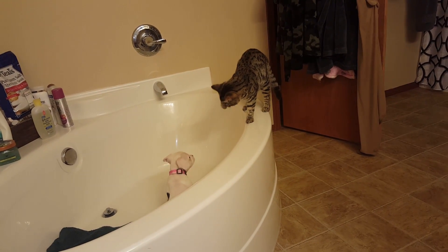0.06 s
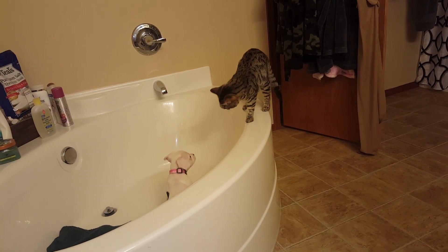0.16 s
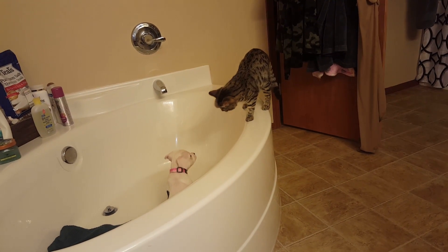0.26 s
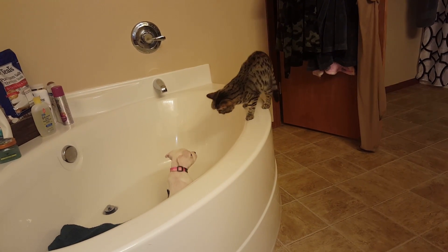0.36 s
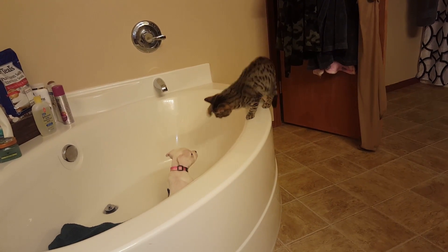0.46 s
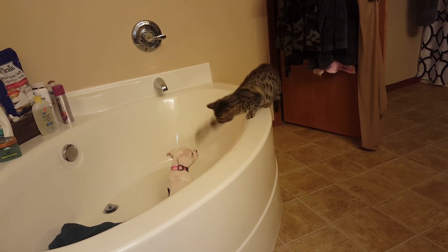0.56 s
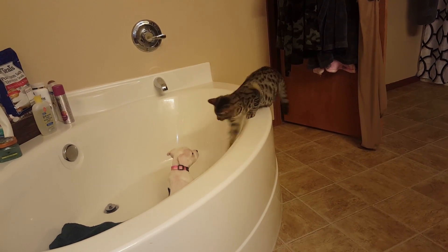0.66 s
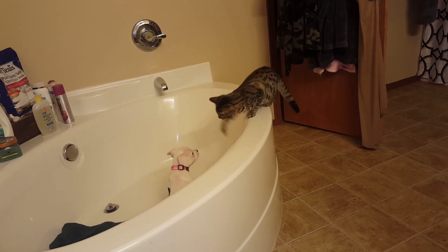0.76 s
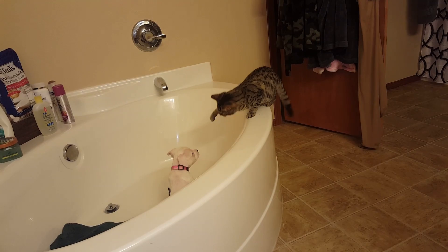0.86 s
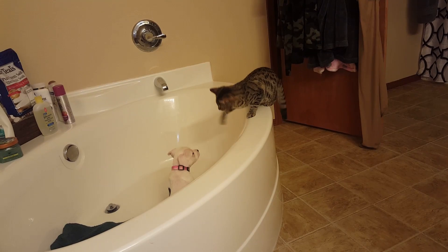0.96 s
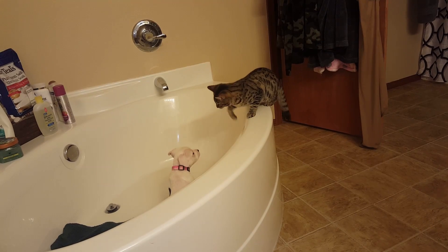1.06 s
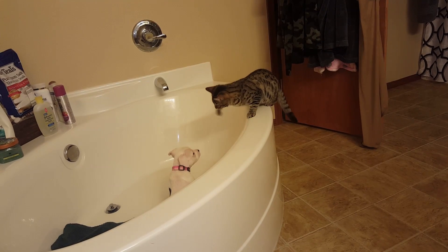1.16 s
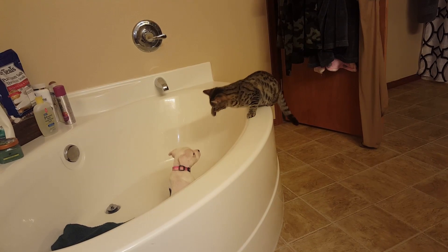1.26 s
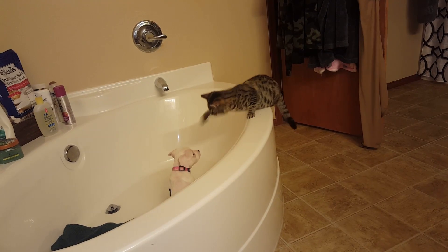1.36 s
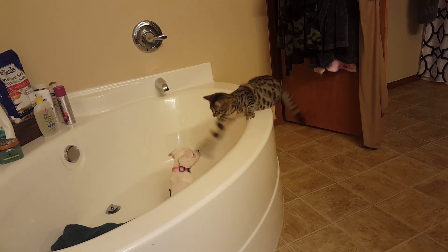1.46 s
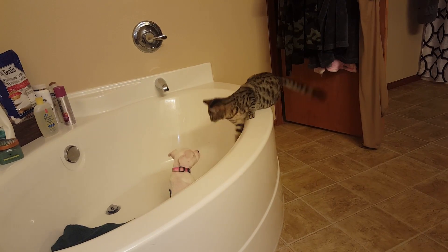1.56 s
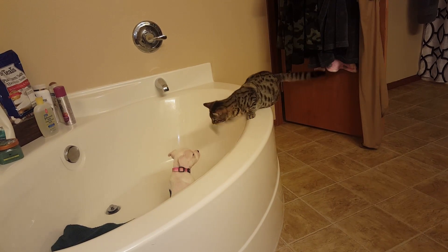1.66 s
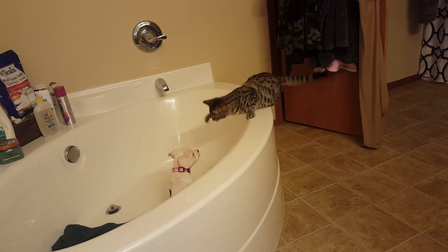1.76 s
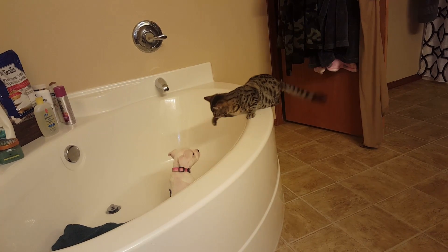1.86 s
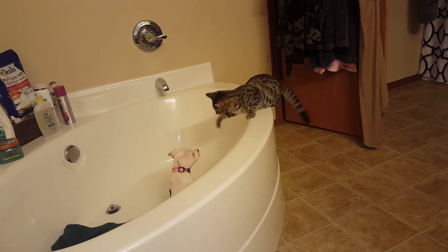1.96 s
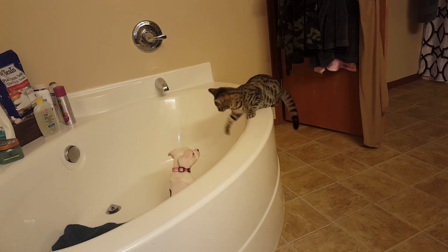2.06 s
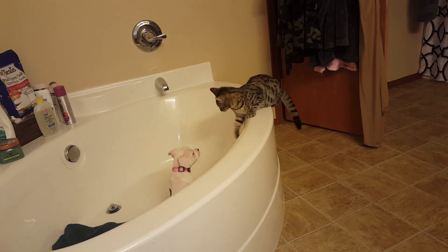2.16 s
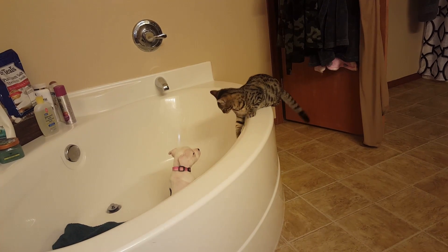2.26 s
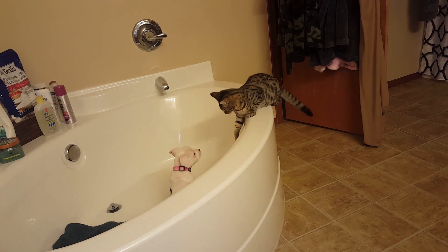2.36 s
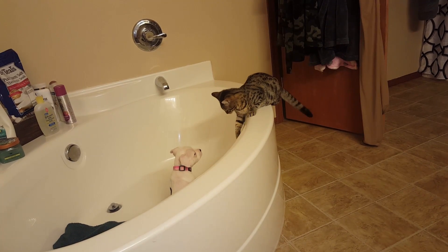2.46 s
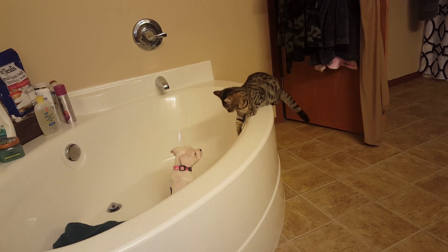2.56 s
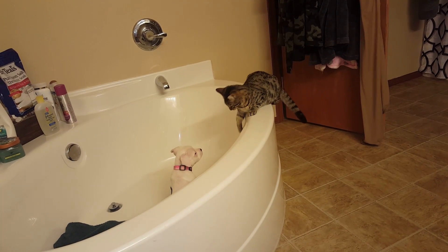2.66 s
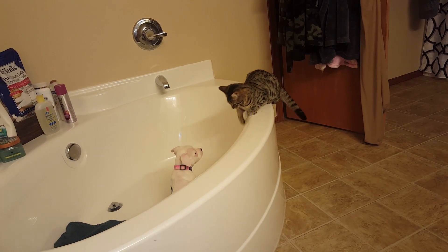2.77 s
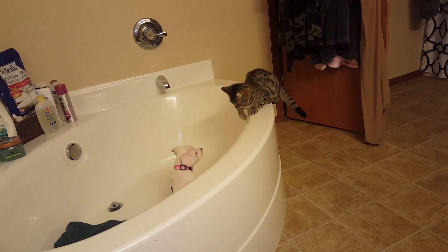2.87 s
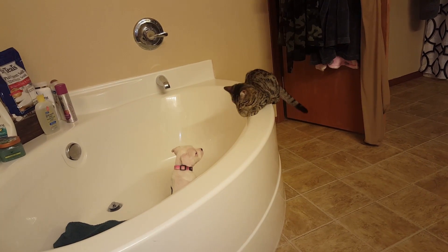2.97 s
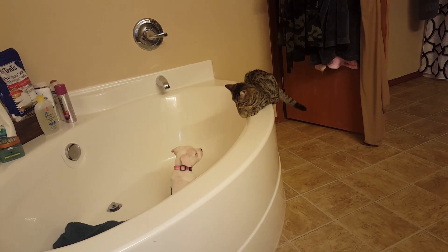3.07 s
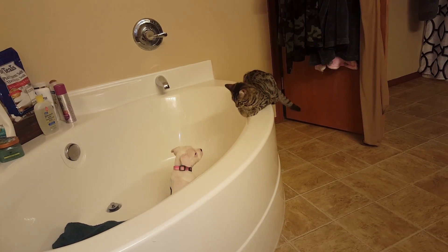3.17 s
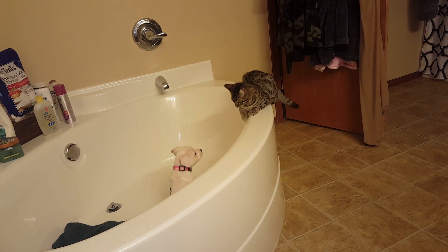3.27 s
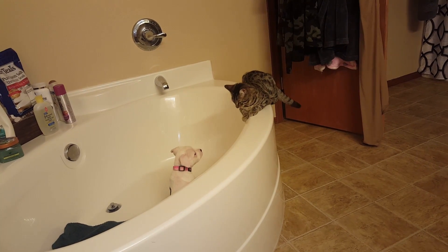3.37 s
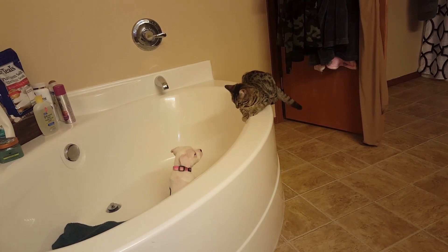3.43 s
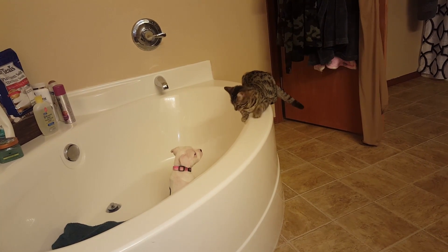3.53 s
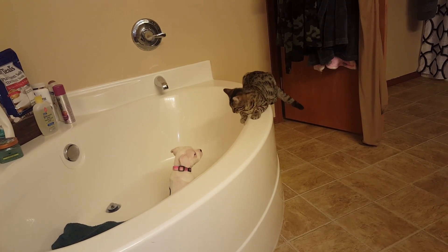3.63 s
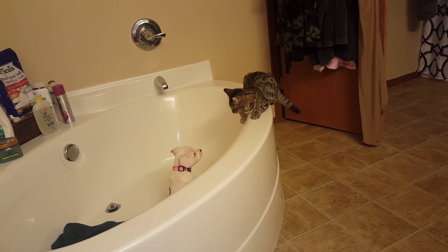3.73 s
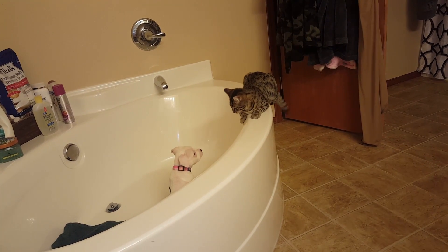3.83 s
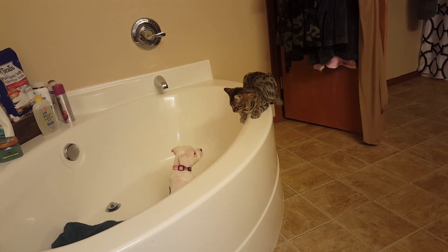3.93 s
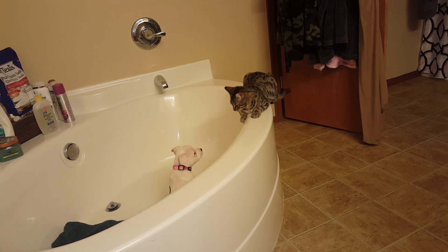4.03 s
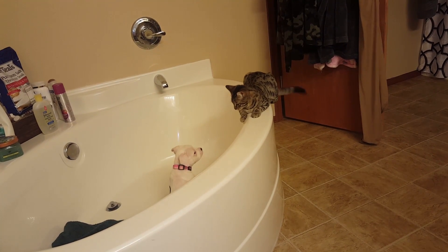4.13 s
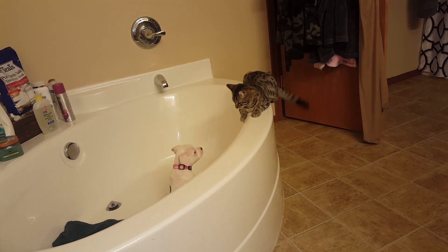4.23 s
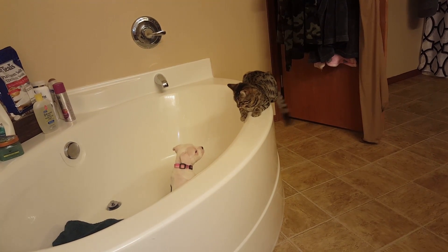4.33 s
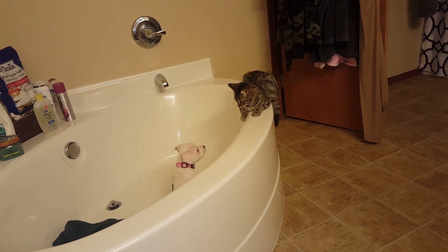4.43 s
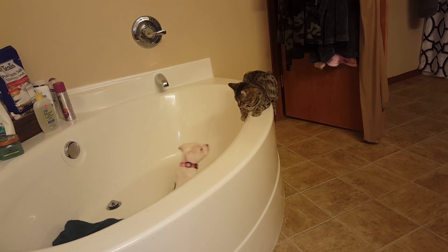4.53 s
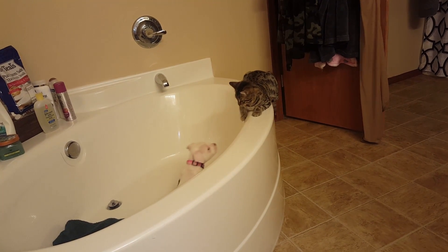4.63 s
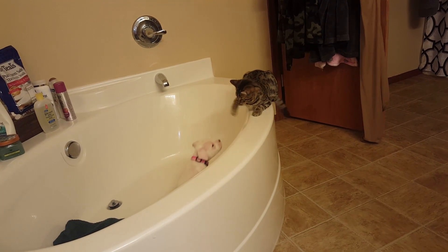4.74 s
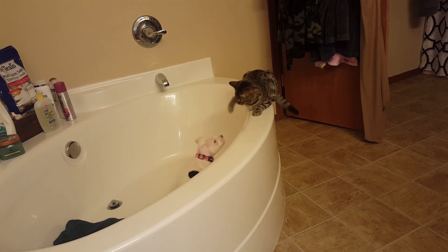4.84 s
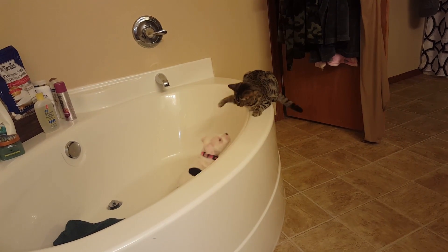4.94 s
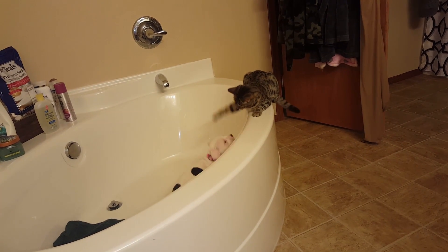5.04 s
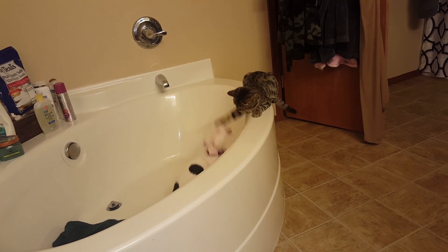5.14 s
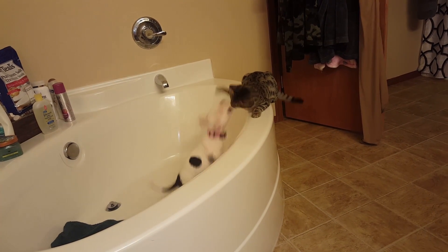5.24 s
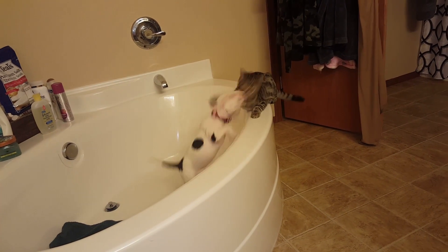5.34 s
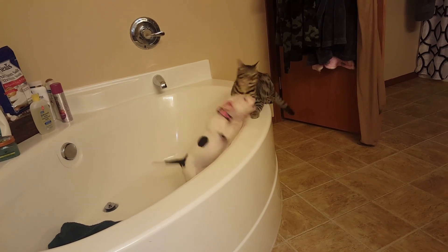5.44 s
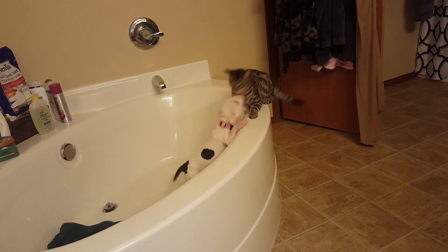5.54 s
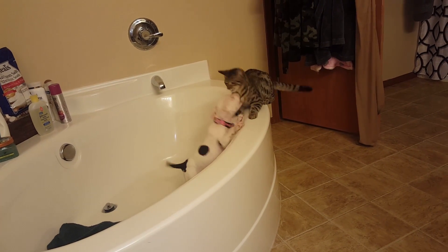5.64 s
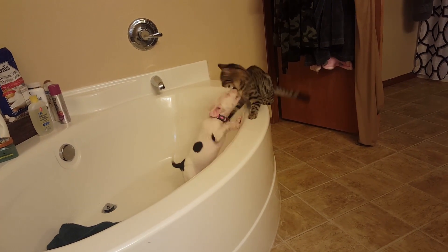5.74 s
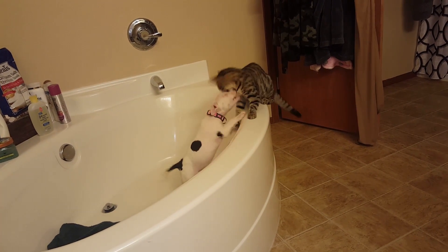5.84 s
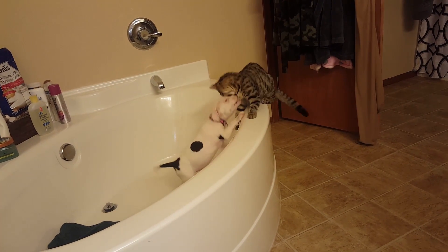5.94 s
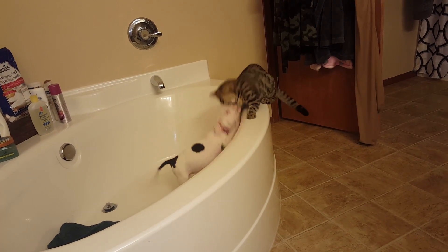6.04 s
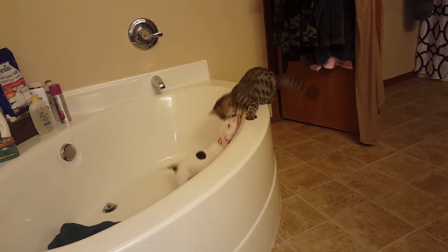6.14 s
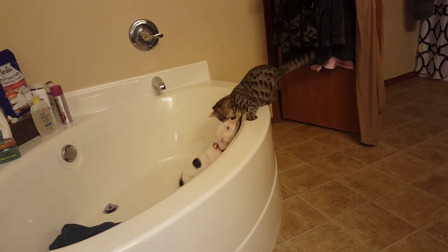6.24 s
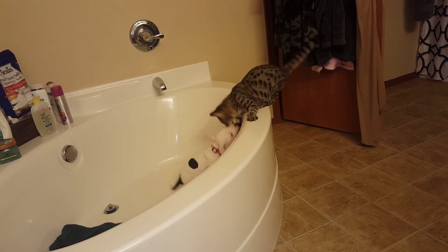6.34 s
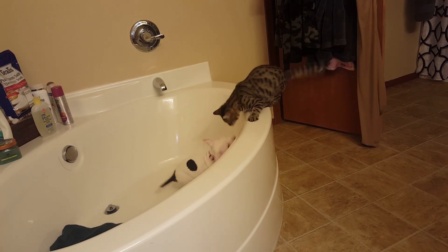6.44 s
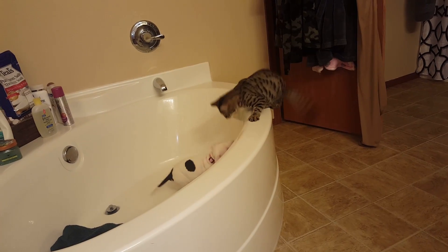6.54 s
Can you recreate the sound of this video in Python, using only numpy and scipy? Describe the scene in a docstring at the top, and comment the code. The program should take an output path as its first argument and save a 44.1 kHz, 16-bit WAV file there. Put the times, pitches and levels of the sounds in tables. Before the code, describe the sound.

A kitten and puppy at a bathtub: near silence with faint thumps and a knock, then paws scrape, bodies thud and the hollow shell booms.

```python
"""Kitten and puppy at the bathtub

A kitten on the rim of an acrylic tub teases a puppy inside, in a small, hard bathroom. After a few soft
bumps and a hollow knock the puppy jumps up, something hard smacks the wall, and paws scrabble and slide.
Blows boom through decaying shell modes, claws and smacks are shaped pulses, and rubbing is trains of tiny
slips. Reflections surround most of these, over a faint far drone, rumble and hiss."""
import sys
import numpy as np
from scipy import signal
from scipy.fft import rfft, irfft
from scipy.io import wavfile

SR = 44100
rng = np.random.default_rng(int(sys.argv[2]) if len(sys.argv) > 2 else 0)


def generate_wav(signal):
    """Clip the signal to [-1, 1] and save it as 16-bit WAV at the path in sys.argv[1]."""
    frames = np.transpose(np.atleast_2d(signal))
    scaled = np.clip(frames, -1, 1) * 32767
    pcm = np.round(scaled).astype(np.int16)
    wavfile.write(sys.argv[1], SR, pcm)


N = 290999
RING = np.arange(int(0.8 * SR)) / SR  # time in seconds for any single sound or echo

# Hard smack and its rebounds. Each row: start in seconds, level in dB before the room.
SMACK_HITS = [(5.5436, -29.5), (5.5470, -34), (5.5525, -43), (5.566, -36.5)]
# Tone of the smack. Each row: frequency in Hz, relative level in dB.
SMACK_SPECTRUM = [(150, -46), (450, -5.5), (1000, -12.5), (1400, -9), (2000, -2), (2750, 1.5), (3400, -3.5),
                  (4400, -1), (5600, -9.5), (6800, -14), (8300, -7.5), (9500, -15.5), (10800, -33.5),
                  (13500, -20.5), (16000, -39)]


def smacks():
    """A hard blow deep in the tub: the rim hides it, so it arrives mostly by reflection."""
    out = np.zeros((2, N))
    crack = click(lambda hz: read(SMACK_SPECTRUM, hz))
    for start_s, db in SMACK_HITS:
        blow = at_level(crack, db)
        add(out, start_s, bathroom(blow, wet_db=11.5, lead_s=-0.0001, pan_db=-1.0, build_s=0.00075))
    return out


# Paws and bodies bumping the shell. Each row: start in seconds, level in dB before the room,
# centre in Hz and width in octaves of the band driven, ring-time factor (under 1 where a body damps it).
BUMP_HITS = [(1.62, -46, 190, 0.87, 1.44), (3.256, -42, 139, 1.1, 0.65), (3.627, -63.5, 746, 1, 0.52),
             (4.838, -60, 154, 3.2, 1.2), (5.09, -46, 350, 1.17, 0.61), (5.160, -52.5, 253, 2.3, 0.37),
             (5.456, -37.5, 154, 3.7, .55), (5.525, -33.5, 119, 5.4, 0.19), (5.588, -31, 510, .3, 0.89),
             (5.695, -44.5, 157, .4, 0.52), (5.908, -43.5, 163, 2.1, 1.3), (5.972, -45.5, 450, 1.6, 0.67),
             (6.069, -45.5, 102, 0.51, 0.65), (6.112, -40.5, 195, 2.5, 1.4), (6.175, -38, 257, 1.1, 1.7),
             (6.277, -36, 134, 2.4, 0.79), (6.372, -43, 235, 1.2, 0.55), (6.581, -51, 339, 2.3, 1.1)]


def bumps():
    """Soft bumps boom in the shell; so do the knock and the smack as they land."""
    out = np.zeros(N)
    for start_s, db, centre_hz, octaves, ringing in BUMP_HITS:
        reach = 2 ** (octaves / 2)  # frequency ratio from the centre to either edge
        add(out, start_s, push(db, centre_hz / reach, centre_hz * reach, ringing))
    add(out, KNOCK_HITS[0][0], push(db=-47, low_hz=110, high_hz=300, ringing=0.77))
    add(out, SMACK_HITS[0][0], push(db=-33, low_hz=42, high_hz=910, ringing=2.14))
    return out


def push(db, low_hz, high_hz, ringing):
    """One blow on the shell, driving the band that its weight and softness allow."""
    def force_db(hz):
        bass_cut = 1 + (low_hz / (hz + 1)) ** 6
        treble_cut = 1 + (hz / high_hz) ** 4
        return -10 * np.log10(bass_cut * treble_cut)

    boom = signal.fftconvolve(shell(panel_db=4.5, ringing=ringing), click(force_db))
    return at_level(boom, db)


# Main modes (natural tones) of the tub shell. Each row: frequency in Hz, relative level in dB,
# seconds to fade by 60 dB before the ring-time factor is applied.
SHELL_MODES = [(39.1, 1, 0.8), (59.7, 11, 0.15), (92.3, 8, 0.34), (130.8, -5, 0.52), (159.65, 1, 0.44),
               (203, 1.5, 0.28), (228, 4, 0.15), (261, -3.5, 0.21), (336, -5.5, 0.53), (453, -5.5, 0.32),
               (578.4, -2, 0.21), (679, -4, 0.27), (772, -12, 0.28), (980, -5.5, 0.15)]
# Its crowded upper modes. Each row: frequency in Hz, relative level in dB.
SHELL_CROWD = [(40, -61.5), (150, -4), (400, -4), (900, -10), (1500, -9.5), (3000, -5.5), (8000, -8),
               (16000, -43)]


def shell(panel_db, ringing=1.0, panel_t60=0.2):
    """The tub's answer to a push: its low modes, and upper ones that differ from spot to spot."""
    low = ring([(hz, db, t60 * ringing) for hz, db, t60 in SHELL_MODES])
    crowd = colour(rng.standard_normal(len(RING)), SHELL_CROWD) * amp(-60 * RING / panel_t60)
    return evened(low) + amp(panel_db) * evened(crowd)


# A body leaning on the wall and sliding down it. Each row: start in seconds, length in seconds,
# level in dB before the room.
SLIDE_STROKES = [(5.047, 0.086, -58.5), (5.399, 0.21, -51), (5.89, 0.16, -59), (6.111, 0.3, -46)]
LEAN_S, LET_GO_DB_PER_S = 0.014, 173  # the weight comes on, holds, then eases off


def drag(low_hz=100, high_hz=1000):
    """Skin catches and lets go on the wall, drumming the damped shell as hard as the body leans."""
    t = np.arange(N) / SR
    weight = np.zeros(N)
    for start_s, length_s, db in SLIDE_STROKES:
        lean = np.clip((t - start_s) / LEAN_S, 0, 1)
        past_end_s = np.maximum(t - start_s - length_s, 0)
        weight += lean * amp(db - LET_GO_DB_PER_S * past_end_s)
    band = signal.butter(2, [low_hz, high_hz], "band", fs=SR, output="sos")
    body = signal.sosfilt(band, shell(panel_db=2.0, ringing=0.55, panel_t60=0.016))
    catches = slips(per_s=620, spread_db=1.5) * weight
    return signal.fftconvolve(catches, body / np.linalg.norm(body))[:N]


# Small hard contacts of claws and collar. Each row: start in seconds, level in dB before the room,
# centre in Hz, spread in octaves, contact time in seconds.
TAP_HITS = [(3.252, -56.5, 630, 0.94, 0.0084), (3.623, -70, 2400, 0.38, 0.0014),
            (3.687, -61.5, 2220, .55, 0.046), (4.232, -58.5, 2330, 0.82, 0.021),
            (4.387, -71.5, 1830, 0.88, 0.017), (4.754, -70.5, 1730, 0.95, 0.015),
            (5.082, -59.5, 3020, 1.6, 0.0082), (5.420, -51.5, 1170, 0.72, 0.011),
            (5.5215, -42, 2400, 0.49, 0.0048), (5.9858, -44.5, 1320, 0.64, .002),
            (6.106, -52.5, 2960, 0.64, 0.006), (6.456, -56, 2370, 0.79, 0.019),
            (6.579, -55.5, 2095, 0.52, 0.0095)]


def taps(skirt_db=32):
    """Claws and collar grate briefly while they touch, through one broad resonance."""
    out = np.zeros((2, N))
    for start_s, db, centre_hz, octaves, contact_s in TAP_HITS:
        def resonance_db(hz):
            distance = np.log2((hz + 1) / centre_hz) / octaves
            return -skirt_db * np.log10(1 + distance ** 2 / 2)

        t = RING[RING < contact_s]
        graze = rng.standard_normal(len(t)) * np.sin(np.pi * t / contact_s)
        tap = at_level(signal.fftconvolve(graze, click(resonance_db)), db)
        add(out, start_s, bathroom(tap, wet_db=2.0, lead_s=0.0001, pan_db=-1.6))
    return out


# Pads and fur brushing the acrylic. Each row: start in seconds, level in dB before the room, fade in seconds.
SWIPE_STROKES = [(1.612, -66.5, 0.01), (2.700, -67, 0.059), (3.251, -67, .014), (5.069, -56, 0.021),
                 (5.153, -54, 0.028), (5.27, -71.5, 0.29), (5.413, -45, 0.02), (5.779, -60, 0.14),
                 (5.874, -56, 0.068), (6.095, -51.5, 0.077), (6.24, -63.5, 0.26), (6.574, -60, .04)]
# Tone of the rubbing. Each row: frequency in Hz, relative level in dB.
FRICTION_SPECTRUM = [(200, -15.5), (1000, -1.5), (2500, 1), (4500, 0), (6500, -0.5), (8600, 2), (10200, -9),
                     (13000, -4), (16000, -12.5)]
SWIPE_RISE = 0.33  # share of a stroke's fade time that it takes to swell


def swipes():
    """Fine friction grains swell and fade with each stroke of a paw."""
    power = np.zeros(N)
    for start_s, db, fade_s in SWIPE_STROKES:
        rise_s = SWIPE_RISE * fade_s
        swell = np.minimum(RING / rise_s, 1)
        fade = np.exp(-np.maximum(RING - rise_s, 0) / fade_s)
        add(power, start_s, (amp(db) * swell * fade) ** 2)
    grains = colour(slips(per_s=5000, spread_db=2), FRICTION_SPECTRUM)
    return np.sqrt(power) * evened(grains)


# One hollow knock on the rim and its rebounds. Each row: start in seconds, level in dB before the room.
KNOCK_HITS = [(2.0642, -37), (2.0714, -41.5), (2.087, -49)]
# Modes of the knocked spot. Each row: frequency in Hz, relative level in dB, seconds to fade by 60 dB.
RIM_MODES = [(407.5, 2.5, 0.06), (444.4, -2.5, 0.093), (510, -4.5, 0.054), (572, -11, 0.061),
             (647, -11, 0.083), (797, -10.5, 0.083), (920, -7.5, 0.049), (1080, -8.5, 0.022),
             (1395, -6, 0.031), (1990, -8, 0.0096), (2500, -4.5, 0.0057), (3700, -14, 0.0041),
             (4230, -24, 0.0096)]


def knocks(low_hz=230):
    """A stiff, quickly damped spot of the rim, too small to radiate bass."""
    out = np.zeros((2, N))
    bass_cut = signal.butter(2, low_hz, "high", fs=SR, output="sos")
    knock = signal.sosfilt(bass_cut, ring(RIM_MODES))
    for start_s, db in KNOCK_HITS:
        add(out, start_s, bathroom(at_level(knock, db), wet_db=-3.0, lead_s=-0.00021, pan_db=-0.8))
    return out


THUD_S, THUD_DB = 0.304, -60.5  # start in seconds, level in dB


def thud(hz=140, length_s=0.016):
    """A tiny dry thud close to the microphone: a short low tone that swells and fades."""
    t = RING[RING < length_s]
    pulse = -np.sin(2 * np.pi * hz * t) * np.sin(np.pi * t / length_s)
    out = np.zeros(N)
    add(out, THUD_S, at_level(pulse, THUD_DB))
    return out


# Swells of a faint far drone. Each row: loudest moment in seconds, level in dB there,
# half length in seconds (the standard deviation of a bell curve).
DRONE_SWELLS = [(0.027, -77.5, 0.12), (2.43, -71.5, 0.073), (4.187, -74.5, 0.21)]


def drone(centre_hz=510, width_hz=55):
    """A narrow band of distant noise, in smooth swells."""
    hz, t = np.fft.rfftfreq(N, 1 / SR), np.arange(N) / SR
    band_gain = 1 / (1 + ((hz - centre_hz) / width_hz) ** 2)
    band = irfft(rfft(noise_pair(N, ROOM_LIKENESS)) * band_gain, N)
    swell = sum(amp(db) * np.exp(-((t - s) / half_s) ** 2 / 2) for s, db, half_s in DRONE_SWELLS)
    return evened(band) * swell


# Tone of the still room. Each row: frequency in Hz, relative level in dB per Hz.
AIR_SPECTRUM = [(20, 2), (45, -10), (95, -1), (170, -5), (300, -8), (500, -10), (1000, -14.5),
                (2300, -16.5), (4500, -21.5), (7000, -25), (8700, -25), (10500, -31), (13000, -26),
                (16000, -26)]
# How alike left and right are in it. Each row: frequency in Hz, likeness (1 is identical, 0 unrelated).
AIR_LIKENESS = [(60, 0.94), (130, 0.53), (290, 0.43), (640, 0.26), (1400, 0), (16000, 0.025)]
AIR_DB = -66.5  # overall level


def air():
    """Still-room rumble and microphone hiss: steady shaped noise."""
    gain = amp(read(AIR_SPECTRUM, np.fft.rfftfreq(N, 1 / SR)))
    noise = irfft(rfft(noise_pair(N, AIR_LIKENESS)) * gain, N)
    return amp(AIR_DB) * evened(noise)


# How long the reflections last. Each row: frequency in Hz, seconds to fade by 60 dB.
ROOM_FADE = [(100, 0.41), (400, 0.41), (1000, 0.41), (3000, 0.38), (6000, 0.38), (9000, 0.31),
             (15000, 0.24)]
# How strong they are. Each row: frequency in Hz, dB relative to the direct sound, before wet_db is added.
ROOM_STRENGTH = [(60, -4), (200, 7), (450, 1), (1000, 10), (2500, 1.5), (15000, 1.5)]
# How alike left and right are. Each row: frequency in Hz, likeness (1 identical, 0 unrelated, below 0 opposed).
ROOM_LIKENESS = [(60, 0.88), (130, 0.95), (290, 0.91), (640, 0.61), (1400, -0.27), (3000, 0.095),
                 (16000, -0.15)]


def bathroom(x, wet_db, lead_s, pan_db, build_s=0.0037):
    """Direct sound (left ahead by lead_s) and dense reflections from close, hard walls, new for every spot."""
    hz, t, echoes = signal.stft(noise_pair(len(RING), ROOM_LIKENESS), SR, nperseg=512)
    t60 = read(ROOM_FADE, hz)[:, None]
    unit_energy = np.sqrt(2 * np.log(1000) / (t60 * SR))
    strength_db = wet_db + read(ROOM_STRENGTH, hz)[:, None]
    echoes = echoes * unit_energy * amp(strength_db - 60 * t / t60)
    response = signal.istft(echoes, SR, nperseg=512)[1][:, :len(RING)]
    response = response * np.minimum(RING / build_s, 1)  # the reflections build up
    # Direct sound: a single pulse on each side, the later side delayed.
    response[0, round(max(-lead_s, 0) * SR)] += 1
    response[1, round(max(lead_s, 0) * SR)] += 1
    sides = amp([[pan_db / 2], [-pan_db / 2]])  # positive pan_db favours the left
    return sides * signal.fftconvolve(x[None], response, axes=1)[:, :N]


def ring(modes):
    """Decaying modes; neighbours swing in opposite directions."""
    out = np.zeros(len(RING))
    for k, (hz, db, t60) in enumerate(modes):
        out += (-1) ** k * amp(db - 60 * RING / t60) * np.sin(2 * np.pi * hz * RING)
    return out


def slips(per_s, spread_db):
    """A random train of tiny stick-slip releases of uneven size."""
    size = amp(spread_db * np.minimum(rng.exponential(1, N), 4))
    happens = rng.random(N) < per_s / SR
    return evened(size * rng.choice([-1, 1], N) * happens)


def noise_pair(count, likeness):
    """White noise for left and right, as alike at each frequency as the table says."""
    a, b = rfft(rng.standard_normal((2, count)))
    same = np.clip(read(likeness, np.fft.rfftfreq(count, 1 / SR)), -1, 1)
    return irfft(np.array([a, same * a + np.sqrt(1 - same ** 2) * b]), count)


def click(db_of_hz, size=4096):
    """The shortest pulse with the given spectrum that does not start before its cause."""
    db = np.maximum(db_of_hz(abs(np.fft.fftfreq(size, 1 / SR))), -100)
    log_gain = np.log(amp(db))
    # The Hilbert transform of the log gain gives the matching minimum phase.
    return np.fft.ifft(np.exp(np.conj(signal.hilbert(log_gain)))).real[:size // 2]


def colour(x, spectrum):
    """Filters a sound to the tone in a table."""
    return signal.fftconvolve(x, click(lambda hz: read(spectrum, hz)))[:len(x)]


def read(points, hz):
    """Reads a table between its rows, along a logarithmic frequency scale."""
    f, value = np.transpose(points)
    return np.interp(np.log(hz + 1), np.log(f + 1), value)


def amp(db):
    """Turns dB into a plain multiplier."""
    return 10 ** (np.asarray(db) / 20)


def evened(x):
    """Scales a sound to an average (RMS) level of 1."""
    return x / np.sqrt(np.mean(x ** 2) + 1e-20)


def at_level(x, db):
    """Gives a blow the energy of 30 ms of steady sound at db."""
    return amp(db) * x / np.sqrt(np.sum(x ** 2) / (0.03 * SR) + 1e-20)


def add(mix, start_s, sound):
    """Mixes in a sound at its start time, cut off at the end of the mix."""
    part = mix[..., round(start_s * SR):][..., :sound.shape[-1]]
    part += sound[..., :part.shape[-1]]


def scene():
    """Places the tub and paws in the bathroom and adds all the other layers."""
    tub = bathroom(bumps() + drag(), wet_db=-5.5, lead_s=0.0001, pan_db=1.5)
    paws = bathroom(swipes(), wet_db=5.0, lead_s=0.0001, pan_db=-1.6)
    return smacks() + tub + taps() + paws + knocks() + thud() + drone() + air()


def record(dry):
    """The recorder's band limit: a steep filter takes away the highest treble."""
    edge_hz = 15900
    low_pass = signal.firwin(511, edge_hz, window=("kaiser", 9), fs=SR)
    return signal.oaconvolve(dry, low_pass[None], "same")


dry = scene()
out = record(dry)
generate_wav(out)
```